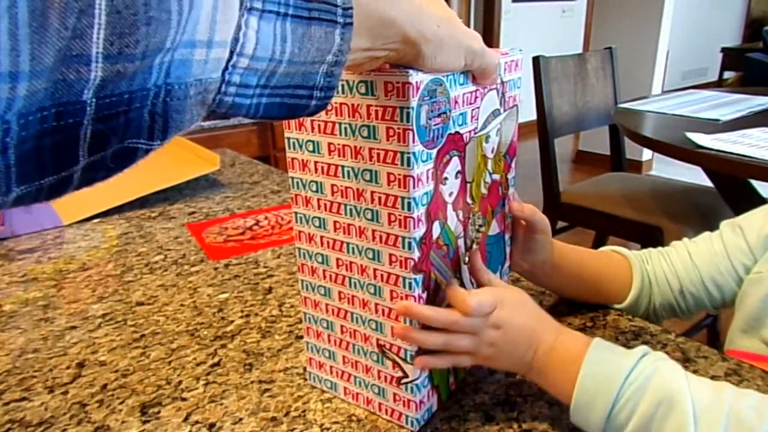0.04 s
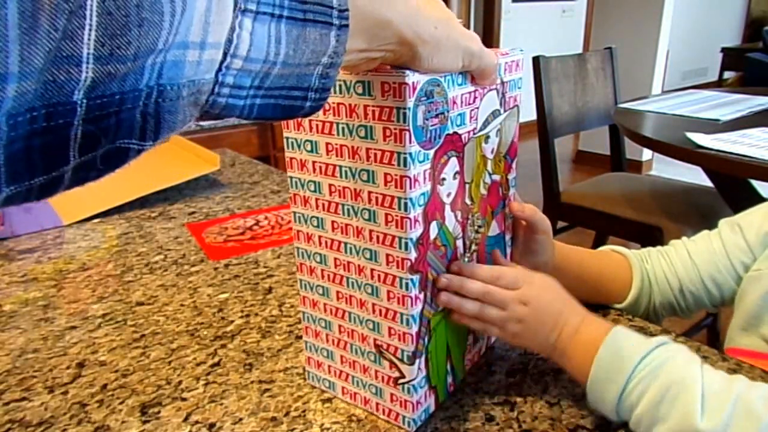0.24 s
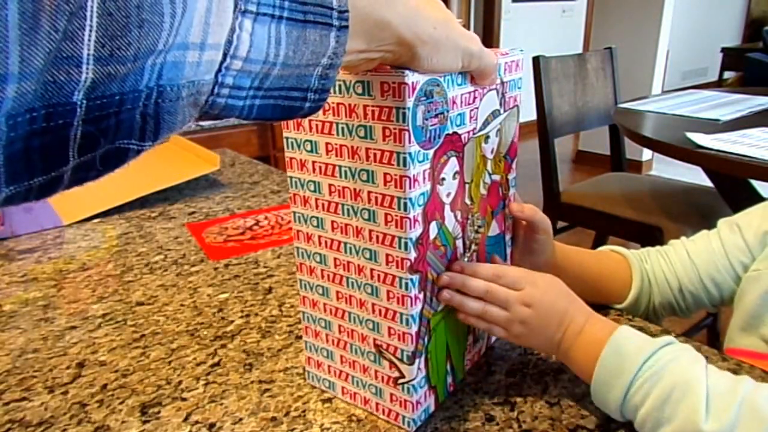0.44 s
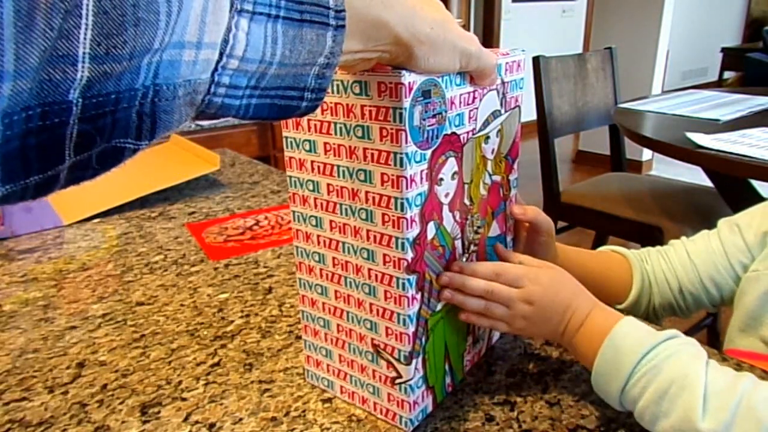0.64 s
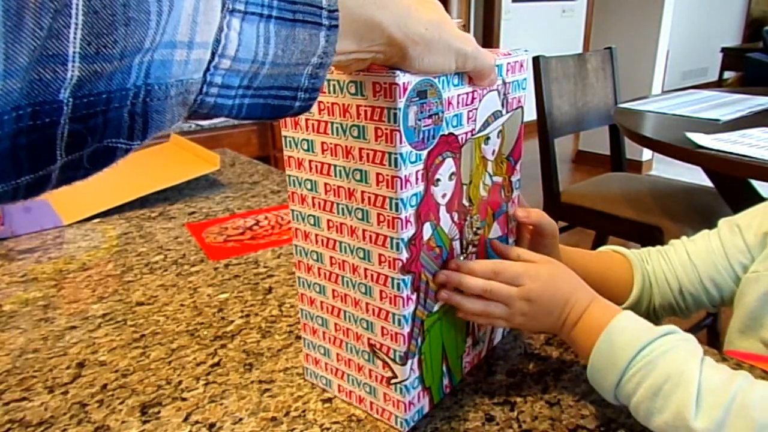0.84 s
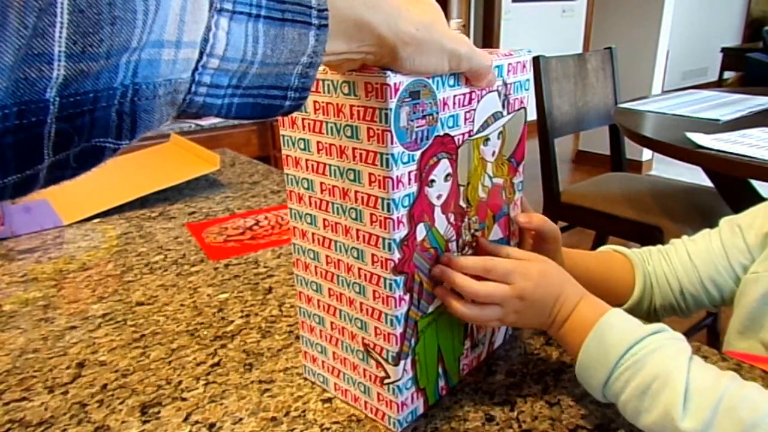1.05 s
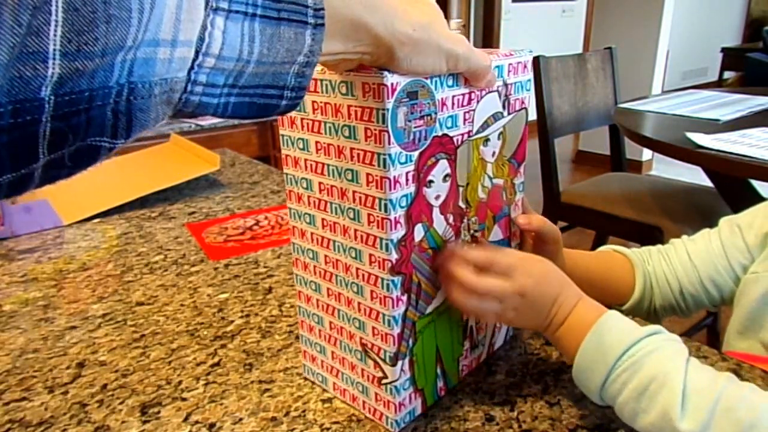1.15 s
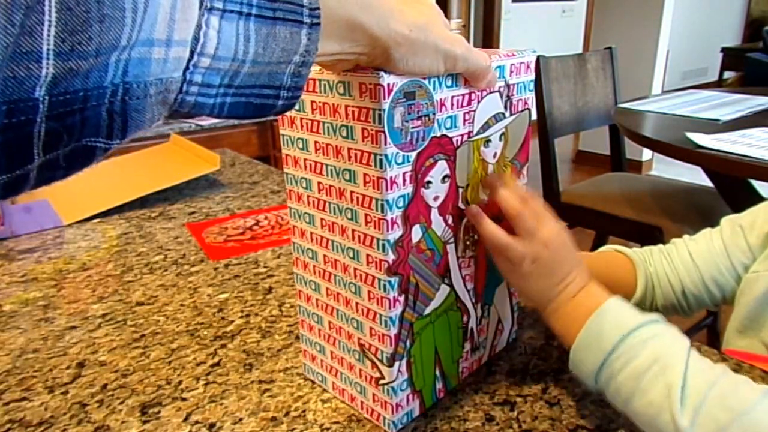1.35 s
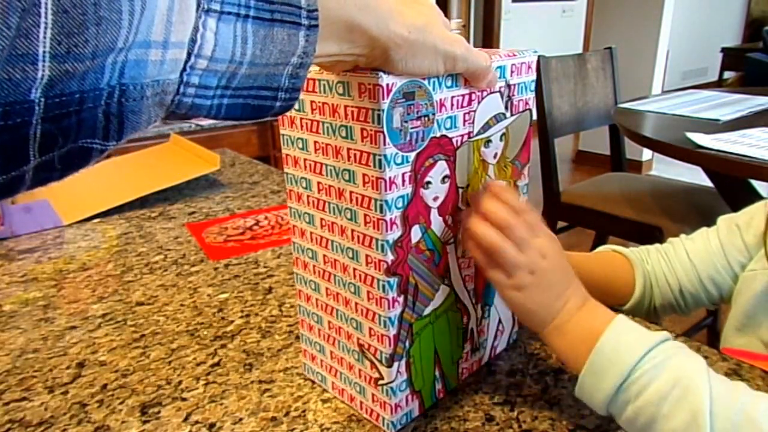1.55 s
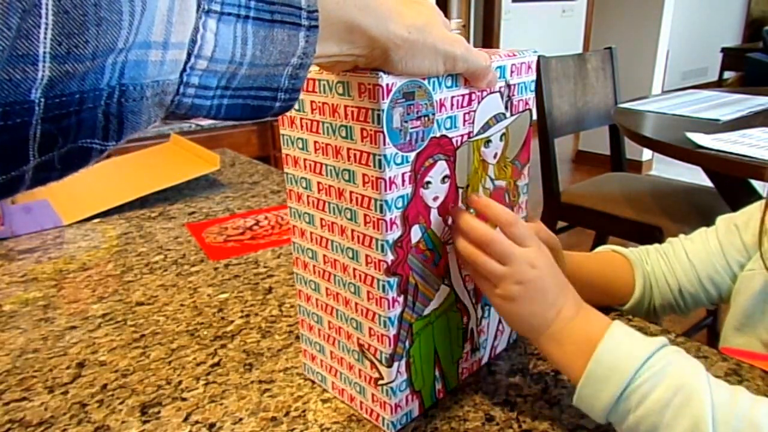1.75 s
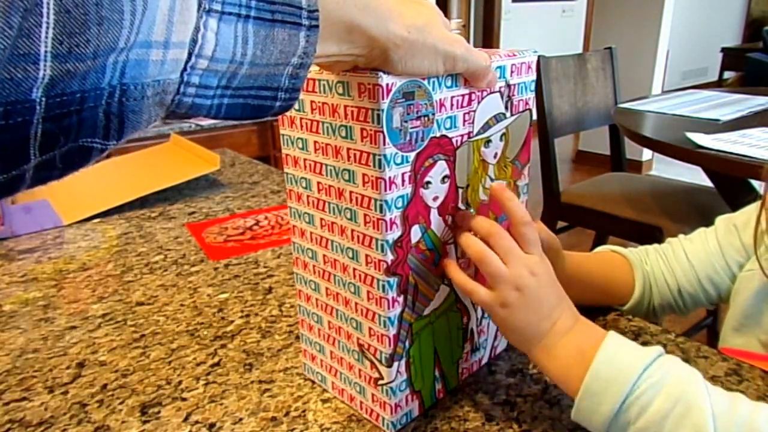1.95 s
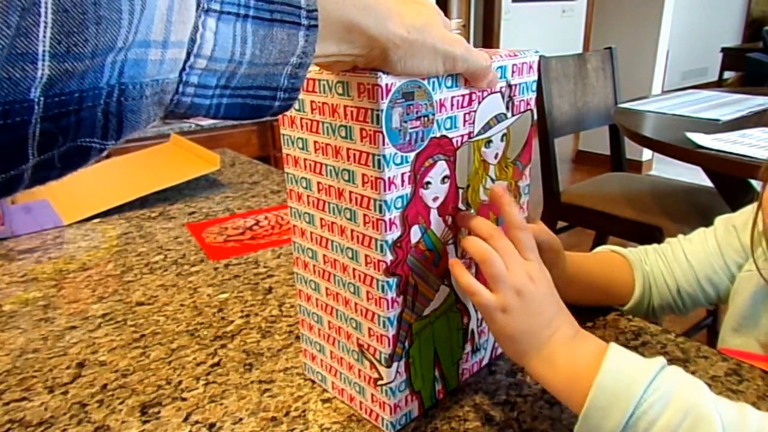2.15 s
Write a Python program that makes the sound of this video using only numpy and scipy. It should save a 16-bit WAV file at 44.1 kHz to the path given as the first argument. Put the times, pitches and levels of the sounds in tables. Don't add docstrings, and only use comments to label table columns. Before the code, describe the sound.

Light hollow knocks, dry skin rubs and crisp little ticks as hands fumble with a small case indoors

```python
import sys
import numpy as np
from scipy import signal
from scipy.fft import rfft, irfft
from scipy.io import wavfile
from scipy.ndimage import uniform_filter1d

SR = 44100
rng = np.random.default_rng(int(sys.argv[2]) if len(sys.argv) > 2 else 0)


def dump_mix(stems):
    frames = np.atleast_2d(stems).T
    limited = np.clip(frames, -1, 1)
    pcm = np.round(limited * 32767).astype(np.int16)
    wavfile.write(sys.argv[1], SR, pcm)


def invert_db(x):
    u = np.asarray(x, float) / 20
    return 10 ** u


N = 97284

# start_s, peak_db, brightness_db_per_octave, lid_db, after_ring_db
TAPS = [(.095, -24.5, 1, 0, -14.5), (.154, -53.5, 20, 11, -4), (0.226, -29, 0.5, 8, -7),
        (0.277, -31, 2, 0, -17), (.304, -59, 3, 17, -9), (.396, -58, 18.5, 3, -14),
        (0.449, -40, 1.5, -6, -12.5), (0.696, -43.5, 2.5, -5, -16), (0.714, -51, 3.5, 7, -11),
        (0.801, -55, -7, -20, -13), (0.817, -42.5, -8, 4, -14), (1.144, -55, 15, -6, -14),
        (1.162, -43, 13.5, 4.5, -18), (1.206, -37, 2, 22, -1.5), (1.2582, -17, 5, -4, -21),
        (1.272, -66, 7, -3, -19), (1.341, -43, 12, 19, -18), (1.487, -46, 7, -7, -18),
        (1.567, -48.5, 2.5, 6.5, -18), (1.59, -35.5, 8, -5, -13.5), (1.6034, -32, 0, 12.5, -18),
        (1.685, -48.5, 3.5, -3, -8), (1.727, -51.5, -6, -20, -7.5), (1.8022, -29.5, -4.5, 11, -11.5),
        (1.816, -53.5, 10, 15, -3.5), (1.829, -41.5, 5, -8, -29), (1.898, -50.5, -6, 5, 0.5),
        (1.973, -61, 8, -31, -6)]
# start_s, length_s, rumble_db, brightness_db_per_octave, skin_hiss_db
SLIDES = [(0.108, 0.24, -58, -1, -73), (0.234, 0.045, -65.5, 13.5, -73), (0.267, 0.029, -54.5, 5, -72),
          (0.342, 0.061, -53.5, -3, -80), (0.523, 0.089, -51.5, -1, -82), (0.625, 0.06, -67, -4, -96),
          (0.816, 0.047, -58.5, -1, -82), (1.036, 0.27, -66, 7, -80), (1.134, 0.067, -62.5, 11, -73),
          (1.189, 0.053, -57.5, 11, -68), (1.277, 0.2, -61, 1.5, -76.5), (1.335, 0.055, -59.5, 3, -84),
          (1.597, 0.025, -57.5, 5, -70), (1.828, 0.015, -67, 12, -88), (1.153, 0.1, -57.5, 6.5, -63.5)]
# start_s, peak_db,
# tilt_db_per_octave, ring_hz, body_db
TICKS = [(0.095, -58.5, 3, 9900, -8), (0.221, -43, 0, 6520, -4), (0.234, -32, -4.5, 10380, -3),
         (1.1444, -52, 1, 10900, 4), (1.163, -55, -18, 10400, -4), (1.2591, -38, -22, 10250, 10),
         (1.3417, -57.5, 4, 10550, -6), (1.5882, -33.5, -8, 9550, -4), (1.594, -51.5, -6, 10000, 8),
         (1.604, -50, 13, 10000, -1), (0.239, -52, 0, 10300, -4), (0.251, -51, 5, 10700, -5),
         (1.221, -54, -18, 6500, -13), (1.23, -51.5, -16, 5880, -8), (1.684, -42.5, 5, 7000, -2),
         (2.03, -55.5, -1, 9330, -9)]
# start_s, peak_db, panel_hz, length_s
CATCHES = [(0.103, -33, 356, 0.015), (0.269, -44, 485, 0.015), (.286, -34.5, 384, 0.0089),
           (0.298, -42, 410, 0.0063), (.35, -38.5, 360, 0.0081), (.357, -36.5, 316, .011),
           (0.366, -36.5, 357, 0.0066), (0.372, -39, 347, 0.012), (0.394, -40.5, 297, 0.0082),
           (0.518, -41.5, 432, 0.0094), (0.527, -36, 295.5, 0.017), (.536, -38, 340, 0.011),
           (.547, -37.5, 256, 0.0074), (.556, -42.5, 313, 0.014), (.563, -45, 261, 0.004),
           (.574, -39, 288, 0.01), (.582, -37, 380, 0.0094), (.592, -36, 333, 0.0054),
           (0.6, -41, 330, 0.0044), (0.608, -41.5, 304, 0.0098), (.825, -44, 309.5, 0.019),
           (1.146, -46, 320, .009), (1.163, -48, 306, 0.019), (1.164, -45, 799, 0.02),
           (1.195, -38, 307, 0.0093), (1.208, -32.5, 809, 0.011), (1.212, -47, 303, 0.013),
           (1.227, -36, 285, 0.013), (1.243, -40.5, 332, .009), (1.268, -34.5, 426, 0.017),
           (1.285, -28, 325, 0.0034), (1.294, -37.5, 332, 0.01), (1.312, -41.5, 405, 0.014),
           (1.336, -46.5, 400, 0.004), (1.369, -43, 440, 0.0062)]
# pitch_hz, level_db, fade_by_60_db_s
BOX = [(175, -16, 0.085), (207.8, -18, 0.15), (276.7, 7, 0.076), (320.4, 3.5, 0.26), (397, -11.5, 0.079),
       (481.2, -6, 0.22), (760, -32, 0.03), (795, -8.5, 0.034), (1044, -12, 0.016), (1184, -22.5, 0.019),
       (1474, -32.5, 0.03), (1620, -48, 0.016), (2400, -76.5, 0.09), (3100, -55, 0.005)]
# pitch_hz, level_db_per_hz
RATTLE = [(120, -54), (200, 22.5), (320, -12), (500, -15), (800, 0.5), (1500, -6.5), (2500, -23.5),
          (5000, -76.5)]
# pitch_hz, level_db_per_hz
RUSTLE = [(300, -32), (550, 13.5), (850, 2), (1100, -3), (1600, -6.5), (2100, -16.5), (2800, -29),
          (4500, -87.5)]
# pitch_hz, level_db_per_hz
SKIN = [(4000, -45), (5000, -16), (6300, -7), (8200, -14), (10300, 0), (11600, -5), (13000, -18),
        (16000, -36)]
# pitch_hz, level_db_per_hz
LATCH = [(3800, -45), (4900, -16), (7000, -8), (9700, 0), (12500, -8), (15000, -16), (16500, -24)]
# pitch_hz, level_db_per_hz
LATCH_BODY = [(1300, -38), (2150, -12), (2500, -37), (3200, -24.5), (4200, -60), (6000, -66)]
# pitch_hz, level_db_per_hz
HUM = [(20, -12), (59, -20.5), (134, -7), (300, -3.5), (600, -9), (1380, -17), (2500, -25.5), (4500, -54.5)]
# pitch_hz, level_db_per_hz
HISS = [(3500, -25), (4600, -6), (5000, -0.5), (7000, 3), (9000, 4.5), (10500, 6), (13500, 5), (15700, 5.5)]
# pitch_hz, fade_by_60_db_s
ROOM = [(200, 0.23), (500, 0.36), (1500, 0.36), (8000, 0.097)]
NOTCH_HZ = [1750, 2050, 2370, 2760, 3700, 4550, 5420, 6400, 7430, 8000, 11720, 14720]
# width_hz, depth_0_to_1
NOTCHES = [(80, 0.39), (78.6, 0.68), (93, 1), (134, 1), (320, 0.39), (193, 1), (183, 0.8), (143, 0.7),
           (252, 0.99), (159, 1), (140, 0.3), (194, 1)]

HUM_DB, HISS_DB, ROOM_DB = -63, -68, -14.5
MAINS_HZ, MAINS_DB = 91, -83
RING_SAMPLES = 9000
RISE_CYCLES, LAG_TURNS = 0.86, 0.24
SPOT_DB = 2.2
LID_HZ, LID_WIDTH_HZ = 800, 130
THUMP_S = 0.011
RATTLE_DB, RATTLE_FADE_S = -6, 0.11
BUMPS_PER_S, BUMP_DB = 760, 7.5
SLIDE_AFTER_DB, RUSTLE_DB = -19, -4.5
SLIDE_LID_DB = 0.6
CATCH_RISE, CATCH_LID_HZ, CATCH_LID_DB = 0.58, 733, -15.5
TICK_RISE_S, TICK_FADE_S = 0.00105, 0.0052
TICK_TAIL_DB, TICK_TAIL_FADE_S = -24, 0.03
CHIRP_DB, CHIRP_WIDTH_HZ = 12, 650
LATCH_BODY_DB, PING_DB = -18, -1.5


def evened(x):
    return x / np.sqrt(np.mean(x ** 2) + 1e-20)


def read(points, hz):
    f, value = np.transpose(points)
    return np.interp(np.log(hz + 1), np.log(f + 1), value)


def add(mix, s, sound):
    part = mix[round(s * SR):][:len(sound)]
    part += sound[:len(part)]


def coloured(x, points, tilt_db=0, centre_hz=9000):
    hz = np.fft.rfftfreq(len(x), 1 / SR)
    level_db = read(points, hz) + tilt_db * np.log2((hz + 1) / centre_hz)
    gain = invert_db(level_db) * (hz > .8 * points[0][0])
    return evened(irfft(rfft(x) * gain, len(x)))


def floor():
    waver = uniform_filter1d(uniform_filter1d(rng.standard_normal(N), 1500), 1500)
    waver_db = .8 * evened(waver)
    hum = invert_db(HUM_DB + waver_db) * coloured(rng.standard_normal(N), HUM)
    mains = np.sqrt(2) * np.sin(2 * np.pi * MAINS_HZ * np.arange(N) / SR)
    hiss = invert_db(HISS_DB) * coloured(rng.standard_normal(N), HISS)
    return hum + invert_db(MAINS_DB + waver_db) * mains + hiss


def kitchen(x):
    echoes = np.zeros(SR // 2)
    at = np.arange(300, len(echoes) - 20, 20)
    echoes[at + rng.integers(0, 20, len(at))] = rng.choice([-1., 1.], len(at))
    hz, t, bands = signal.stft(echoes, SR, nperseg=256)
    fade = invert_db(-60 * t / read(ROOM, hz)[:, None])
    tail = signal.istft(bands * fade, SR, nperseg=256)[1]
    return signal.fftconvolve(x, tail / np.linalg.norm(tail))[:N]


def ticks():
    out, noise = np.zeros(N), rng.standard_normal((len(TICKS), 2, 4096))
    t, hz = np.arange(4096) / SR, np.fft.rfftfreq(4096, 1 / SR)
    rise = np.minimum(t / TICK_RISE_S, 1)
    after = np.maximum(t - TICK_RISE_S, 0)
    for (s, db, tilt_db, ring_hz, body_db), n in zip(TICKS, noise):
        chirp = 1 + invert_db(CHIRP_DB) / (1 + ((hz - ring_hz) / CHIRP_WIDTH_HZ) ** 2)
        crackle = evened(irfft(rfft(coloured(n[0], LATCH, tilt_db)) * chirp))
        body = invert_db(LATCH_BODY_DB + body_db) * coloured(n[0], LATCH_BODY)
        ping = invert_db(PING_DB) * np.sin(2 * np.pi * ring_hz * t)
        tick = rise ** 0.43 * invert_db(-60 * after / TICK_FADE_S) * (crackle + body + ping)
        tail = rise * invert_db(TICK_TAIL_DB - 60 * after / TICK_TAIL_FADE_S) * coloured(n[1], SKIN)
        add(out, s, invert_db(db) * (tick + tail) / abs(tick).max())
    return out


def ring(bright_db, spot, noise, lid_db, after_db):
    t = np.arange(RING_SAMPLES) / SR
    hz, db, fade_s = np.transpose(BOX)[:, :, None]
    hz = hz * (1 + .012 * spot[1][:, None])
    db = db + SPOT_DB * spot[0][:, None] + bright_db * np.log2(hz / 330)
    db = db + lid_db * (abs(hz - LID_HZ) < LID_WIDTH_HZ)
    build_up = 1 - np.exp(-t * hz / RISE_CYCLES)
    swing = np.sin(2 * np.pi * (hz * t - LAG_TURNS * np.log2(800 / hz)))
    notes = invert_db(db - 60 * t / fade_s) * build_up * swing
    sound = notes.sum(0) * (invert_db(after_db) + np.exp(-(t / THUMP_S) ** 3))
    sound = sound / abs(sound).max()
    rattle_level = np.minimum(t / 0.0021, 1) * invert_db(RATTLE_DB + after_db - 60 * t / RATTLE_FADE_S)
    return sound + rattle_level * coloured(noise, RATTLE, bright_db, 330)


def slides():
    out, count = np.zeros(N), len(SLIDES)
    spots = rng.standard_normal((count, 3, 2, len(BOX)))
    draws = rng.random((count, 4, RING_SAMPLES))
    noise = rng.standard_normal((count, 5, RING_SAMPLES))
    for (s, length, db, bright_db, hiss_db), spot, draw, n in zip(SLIDES, spots, draws, noise):
        chance, sign, size, place = draw
        u = np.clip(np.arange(RING_SAMPLES) / SR / length, 0, 1)
        stroke = np.minimum(u / .06, 1) * (1 - u ** 5.0)
        bumps = (chance < BUMPS_PER_S / SR) * np.sign(sign - .5)
        bumps = bumps * invert_db(-BUMP_DB * np.log(size + 0.032)) * stroke
        rumble = np.zeros(2 * RING_SAMPLES - 1)
        for k in range(3):
            answer = ring(bright_db, spot[k], n[k], SLIDE_LID_DB * bright_db, SLIDE_AFTER_DB)
            rumble += signal.fftconvolve(bumps * (place * 3 // 1 == k), answer)
        add(out, s, invert_db(db) * rumble / np.sqrt((rumble ** 2).sum() / (length * SR)))
        grain = invert_db(3 * evened(uniform_filter1d(uniform_filter1d(n[4], 60), 60)))
        rustle = stroke * grain * coloured(n[3][::-1], RUSTLE, bright_db, 850)
        add(out, s, invert_db(db + RUSTLE_DB) * rustle)
        skin_hiss = np.sin(np.pi * u ** 1.3) ** .6 * grain * coloured(n[3], SKIN)
        add(out, s, invert_db(hiss_db) * skin_hiss)
    return out


def catches():
    out = np.zeros(N)
    for s, db, hz, length in CATCHES:
        t = np.arange(0, 1.186 * length, 1 / SR)
        panel = np.sin(2 * np.pi * hz * t)
        lid = invert_db(CATCH_LID_DB) * np.sin(2 * np.pi * CATCH_LID_HZ * t)
        swell = np.sin(np.pi * (t / t[-1]) ** CATCH_RISE) ** 2
        add(out, s, invert_db(db) * swell * (panel + lid))
    return out


def taps():
    out, count = np.zeros(N), len(TAPS)
    spots = rng.standard_normal((count, 2, len(BOX)))
    noise = rng.standard_normal((count, RING_SAMPLES))
    for (s, db, bright_db, lid_db, after_db), spot, n in zip(TAPS, spots, noise):
        add(out, s, invert_db(db) * ring(bright_db, spot, n, lid_db, after_db))
    return out


def scene():
    no_bass = signal.butter(6, 165, "high", fs=SR, output="sos")
    case = signal.sosfilt(no_bass, taps() + catches() + slides() + ticks())
    return (case + invert_db(ROOM_DB) * kitchen(case) + floor())[None]


def roll_off(x):
    return signal.sosfilt(signal.butter(12, 16470, fs=SR, output="sos"), x)


def record(dry):
    hz = np.fft.rfftfreq(N, 1 / SR)
    gain = np.where(hz < 15780, 1, invert_db(-46.0))
    for notch_hz, (width, depth) in zip(NOTCH_HZ, NOTCHES):
        gain = gain * (1 - np.clip(depth, 0, 1) / (1 + 1j * (hz - notch_hz) / width))
    gain = gain / (1 + (75 / (hz + 1)) ** 7.4) ** .5
    return roll_off(irfft(rfft(dry) * gain, N))


dry = scene()
out = record(dry)
dump_mix(out)
```